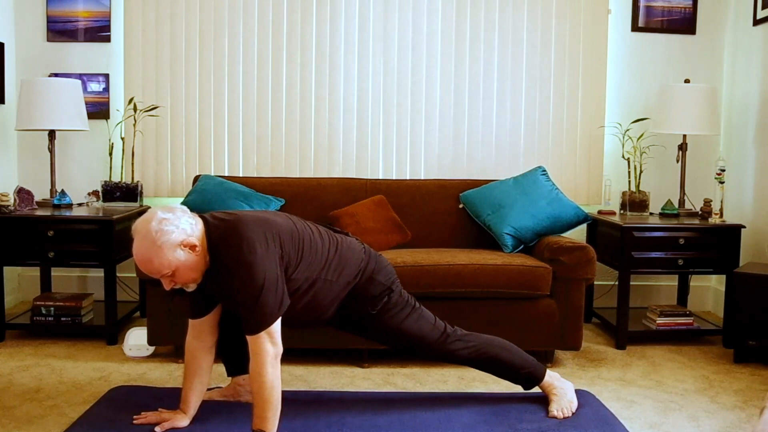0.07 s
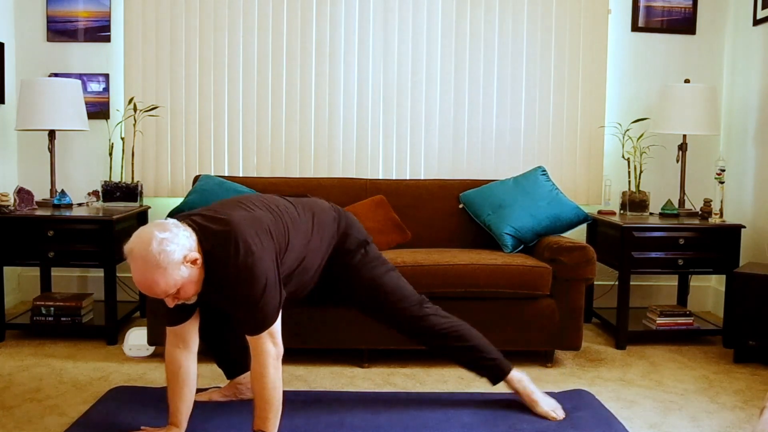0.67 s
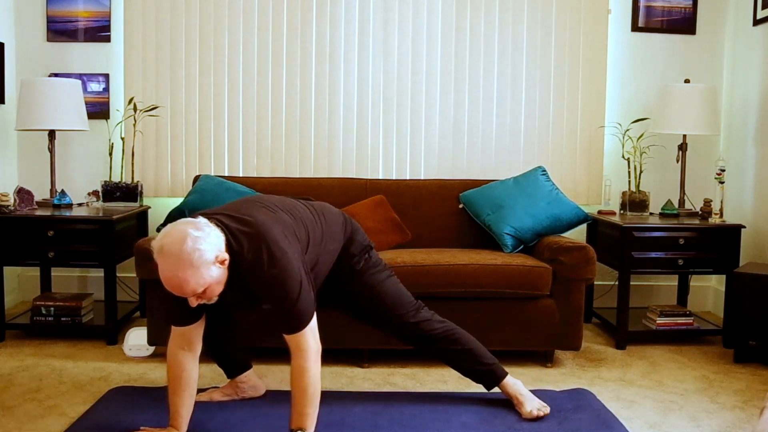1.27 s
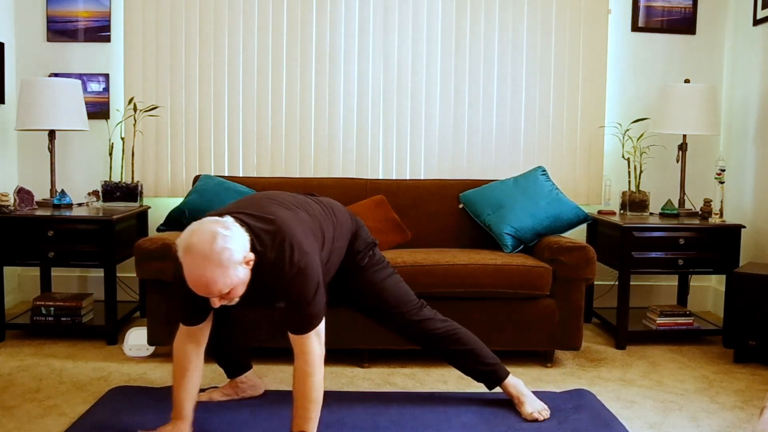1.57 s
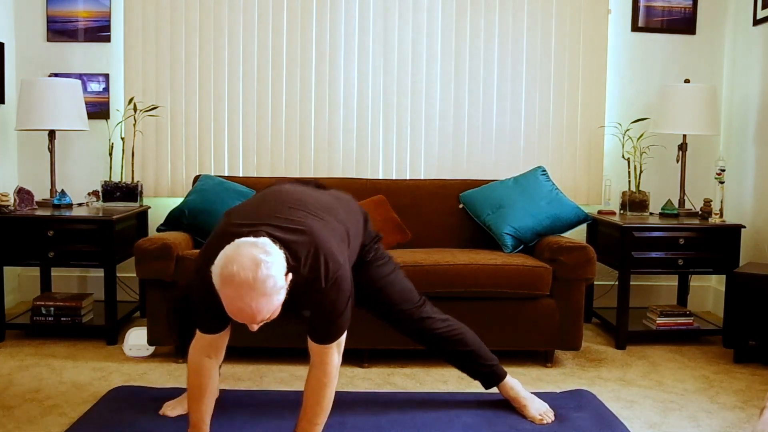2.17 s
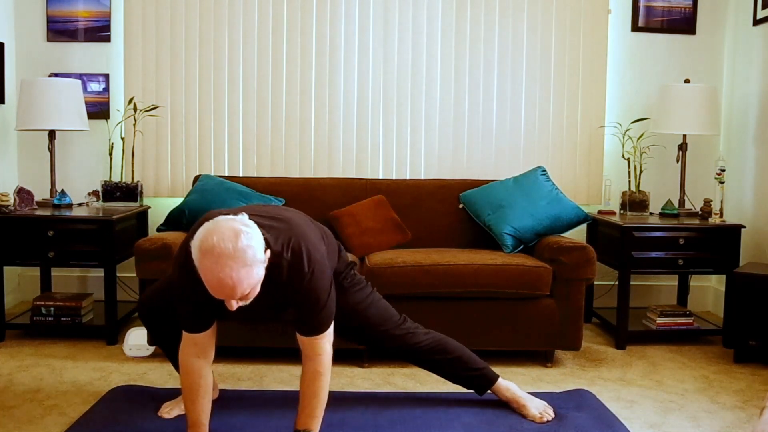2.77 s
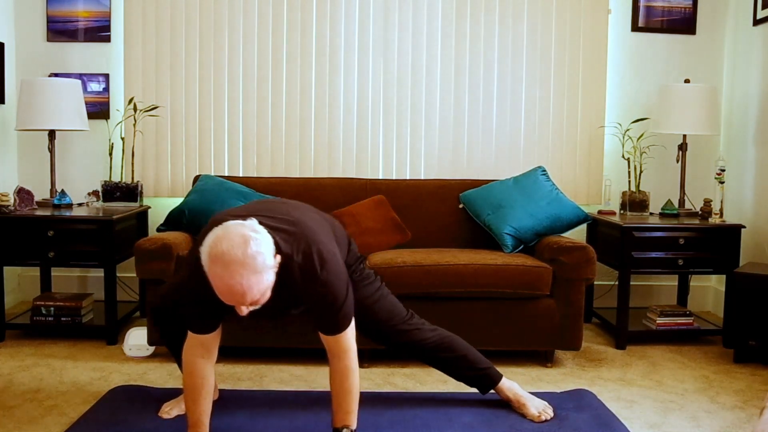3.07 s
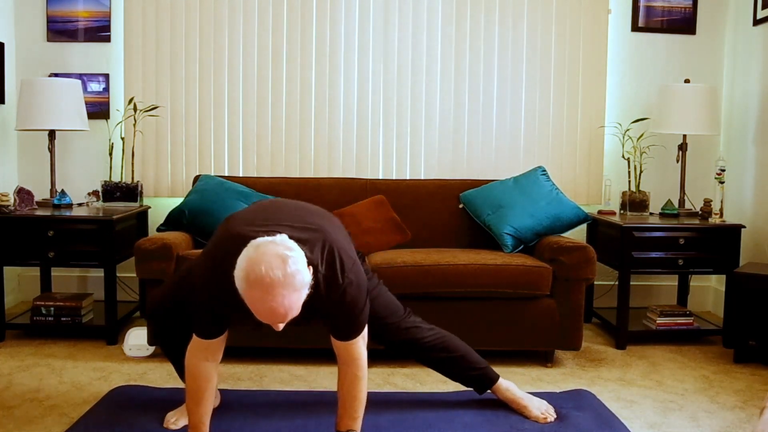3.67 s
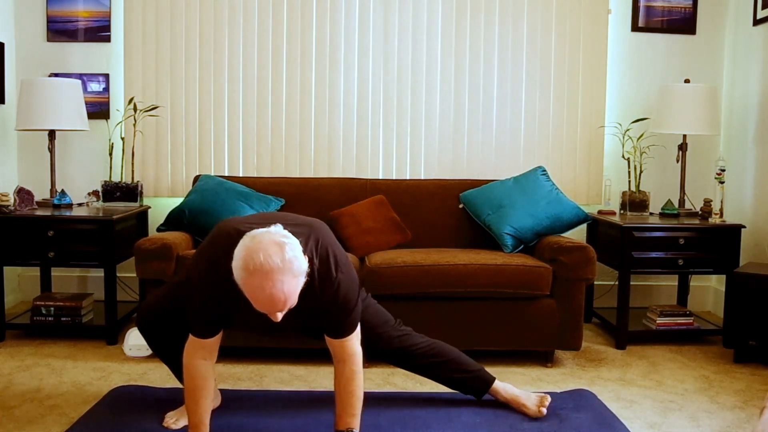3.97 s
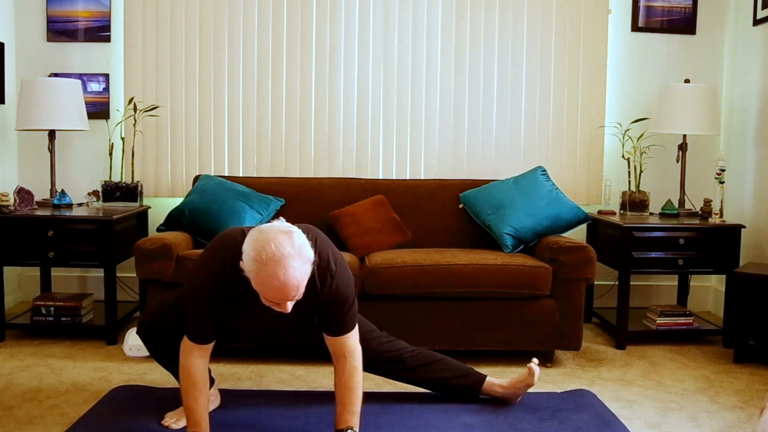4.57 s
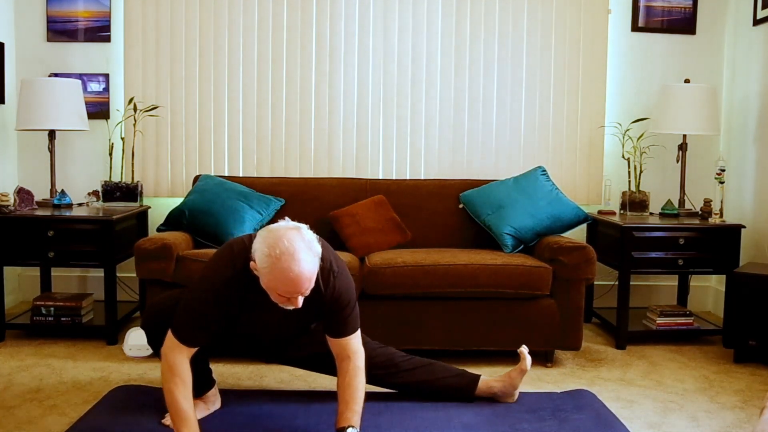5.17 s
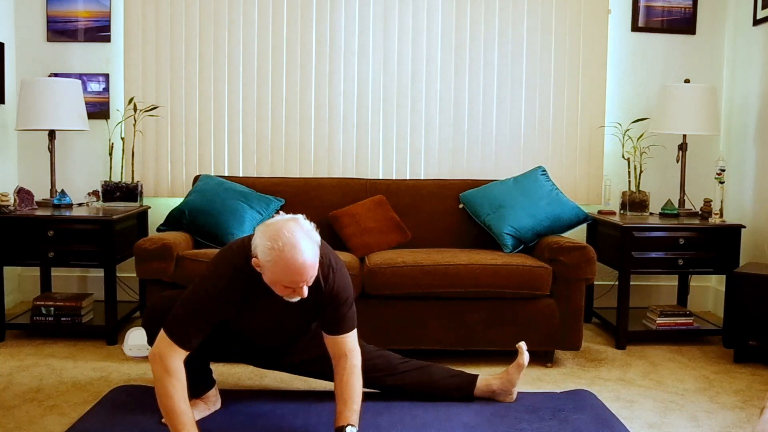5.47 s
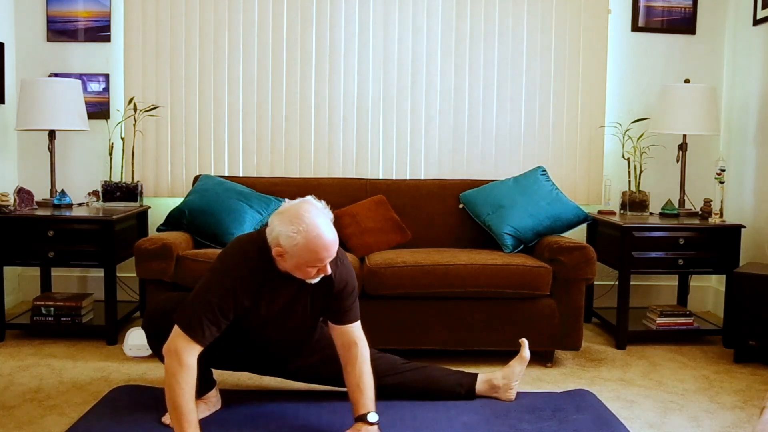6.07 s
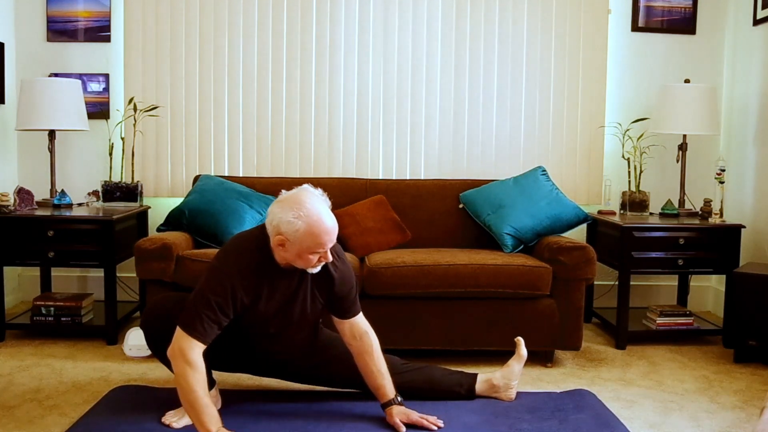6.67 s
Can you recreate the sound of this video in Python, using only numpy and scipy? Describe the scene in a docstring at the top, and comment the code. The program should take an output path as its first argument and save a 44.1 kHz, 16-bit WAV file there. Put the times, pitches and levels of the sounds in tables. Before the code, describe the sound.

Soft clothing swishes, skin scuffs and dull thuds of hands and feet shifting on a foam mat in a quiet room.

```python
"""A quiet, carpeted living room, where a person shifts from a lunge into a side stretch on a foam mat.
Sliding friction makes clothes swish and skin drag and scuff; sticking skin snaps and squeaks once.
Hands and heels thud on a springy floor and excite its modes, and a joint cracks.
One microphone picks it up over room tone, its own hiss and a thin electronic whine."""
import sys
import numpy as np
from scipy import signal
from scipy.fft import rfft, irfft
from scipy.io import wavfile

SR = 44100
rng = np.random.default_rng(int(sys.argv[2]) if len(sys.argv) > 2 else 0)


def bounce(signal):
    """Save signal as a 16-bit WAV file at the path given by the first command-line argument."""
    frames = np.transpose(np.atleast_2d(signal))
    limited = np.clip(frames, -1, 1)
    pcm = np.round(limited * 32767).astype(np.int16)
    wavfile.write(sys.argv[1], SR, pcm)


N = 305678
T = np.arange(N) / SR

# Spectrum of room tone and microphone hiss: f/Hz, relative level/dB
BACKGROUND_SPECTRUM = [(26, -36), (45, -1), (106, -1.5), (145, -3.5), (243, -3.5), (334, -4.5), (377, -5),
                       (662, -6.5), (748, -5), (805, -8), (1680, -10), (1940, -12), (13400, -17.5),
                       (15500, -17)]
# Cloth sliding on cloth, one stroke per move of a limb: peak t/s, level/dB, rise/s, fall/s
CLOTH_STROKES = [(.338, -43.5, 0.036, 0.034), (.607, -50, 0.017, .02), (.73, -45.5, 0.054, 0.095),
                 (.895, -46, .01, .025), (.96, -49, .03, .08), (1.155, -50.5, 0.037, 0.028),
                 (1.29, -45, 0.029, 0.033), (1.655, -41, 0.024, 0.019), (1.748, -44.5, 0.017, 0.029),
                 (1.99, -47.5, 0.042, 0.066), (2.29, -50, .015, 0.065), (2.93, -51.5, .03, 0.022),
                 (3.135, -50.5, 0.022, 0.016), (3.32, -48.5, .016, 0.067), (3.55, -54.5, .02, 0.17),
                 (4.06, -52, .05, 0.093), (4.52, -52, 0.031, 0.086), (4.79, -54, .04, 0.28),
                 (5.28, -52, 0.061, 0.066), (6.08, -61, .1, 0.063), (6.575, -52, .028, 0.13)]
# Spectrum of a cloth swish, including the microphone's peak near 11 kHz: f/Hz, relative level/dB
CLOTH_SPECTRUM = [(150, -5.5), (450, -4), (1200, -9.5), (2500, -10.5), (5000, -8.5), (8000, -6.5),
                  (10000, -2), (11400, 2), (13000, -8), (15500, -10.5)]
# Skin dragging over the mat: peak t/s, level/dB, rise/s, fall/s
SKIN_DRAGS = [(.335, -53, .012, 0.047), (.735, -45.5, .05, 0.064), (.897, -48.5, .012, 0.095),
              (1.14, -58.5, .02, .03), (1.29, -61, .03, .03), (1.965, -50.5, 0.017, 0.074),
              (2.295, -60, .02, .06), (3.335, -51.5, 0.027, 0.054), (4.05, -58, 0.046, .07)]
# Spectrum of dragging skin: f/Hz, relative level/dB
DRAG_SPECTRUM = [(150, -16.5), (450, -0.5), (1000, -8.5), (1800, -4.5), (2800, -2), (4200, -4.5),
                 (6500, -10.5), (12000, -18)]
# Weight dropping on the joists: t/s, sway level/dB
JOIST_LOADS = [(.5, -47.5), (0.829, -40), (1.22, -41), (2.216, -28), (3.319, -42), (3.546, -34),
               (4.24, -48.5)]
# Hands and feet landing: t/s, contact level/dB, cutoff f/Hz, push time/s, knock f/Hz,
# relative knock level/dB, level of the following weight/dB
LANDINGS = [(.585, -47, 1100, 0.0072, 715, -4, -62), (0.939, -52.5, 450, .004, 238, 11.5, -66),
            (2.04, -39, 950, 0.0081, 430, 0, -56), (2.193, -41, 1400, .016, 840, -2, -58),
            (3.207, -33.5, 1600, 0.0013, 1013, -6.5, -40), (3.261, -42.5, 700, .008, 100, -2, -44),
            (3.388, -39.5, 550, .011, 440, 3, -45), (3.4, -38, 420, 0.0044, 336, 6, -48),
            (3.415, -44, 400, .008, 211, 12, -60), (3.521, -41, 750, 0.006, 270, -4, -58),
            (5.234, -45, 700, .01, 151, 2, -49.5), (5.366, -45, 890, 0.0054, 406, -6, -49),
            (5.5945, -39.5, 1400, .0008, 152, -5, -46), (5.832, -42, 450, 0.0068, 155, 1, -57),
            (6.719, -55, 600, .009, 186, 0, -59)]
# Spectrum of a blow on the floor: f/Hz, relative level/dB
THUD_SPECTRUM = [(40, -22), (90, 1.5), (170, 1.5), (300, -3), (600, -3), (1000, -10), (1400, -10.5),
                 (3000, -12), (8000, -6)]
# Modes of the floor under the mat: f/Hz, bandwidth/Hz, gain/dB
BOARD_MODES = [(172, 22, -8), (447, 70, -12), (800, 53, 7), (1017, 41, 8)]
# Quick scuffs of a foot: peak t/s, level/dB, rise/s, fall/s, treble tilt/(dB per octave)
FOOT_SCUFFS = [(2.043, -29, 0.0061, 0.0018, 1), (2.048, -18.5, 0.0015, 0.0018, 13),
               (2.066, -31.5, 0.011, 0.031, -1.5), (2.0766, -28, 0.0032, 0.011, 4.5),
               (2.205, -40.5, 0.017, 0.039, 2), (3.409, -30, 0.012, 0.019, -0.5)]
# Spectrum of a foot scuff, including the microphone's peak near 11 kHz: f/Hz, relative level/dB
SCUFF_SPECTRUM = [(240, -27), (400, 2), (560, -14), (663, -4), (1000, -11.5), (1100, -9), (1510, -12.5),
                  (1740, -4), (1990, -13.5), (2360, -3), (2670, -6.5), (3460, -9), (7790, -8),
                  (11600, -0.5), (15500, -10.5)]
# Snaps of sticking skin, small ticks and joint cracks: t/s, level/dB, f/Hz, relative echo level/dB
SNAPS = [(2.045, -18, 6500, 4), (2.0474, -11.5, 7850, -1), (5.7699, -31, 8000, -5),
         (5.7764, -24, 10400, -2), (5.798, -30.5, 1510, 5), (5.7981, -31, 3230, 3), (5.804, -24, 5430, 2),
         (5.807, -26.5, 8600, 1.5)]


def undb(db):
    """Amplitude ratio of a level in decibels."""
    return 10 ** (np.asarray(db) / 20)


def unit(x):
    """Normalisation to an rms of 1."""
    return x / np.sqrt(np.mean(x ** 2))


def add(out, s, x):
    """Superposition: x adds to out from time s."""
    i = int(s * SR)
    out[i:i + len(x)] += x[:len(out) - i]


def colour(x, points):
    """Minimum-phase filter through (f/Hz, level/dB) points; it conserves the power of white noise."""
    hz, db = np.transpose(points)
    size = 8192
    f = np.maximum(np.fft.rfftfreq(size, 1 / SR), 1)
    gain = undb(np.interp(np.log(f), np.log(hz), db))
    cepstrum = irfft(np.log(gain))
    cepstrum[1:size // 2] *= 2  # folding onto positive time makes the filter causal
    cepstrum[size // 2 + 1:] = 0
    response = irfft(np.exp(rfft(cepstrum)))
    return signal.fftconvolve(x, response / np.linalg.norm(response))[:len(x)]


def resonate(x, hz, width_hz):
    """Second-order resonance with unit gain at its centre."""
    return signal.lfilter(*signal.iirpeak(hz, hz / width_hz, fs=SR), x)


def wander(rate_hz):
    """Random modulation of rms 1, interpolated between rate_hz values a second."""
    knots = rng.standard_normal(4096)
    return unit(np.interp(T * rate_hz, np.arange(len(knots)), knots))


def friction(spread_db, patchy_db, patch_hz):
    """Friction noise is the sum of countless tiny slips of unequal size, coming in patches."""
    slips = rng.standard_normal(N) * undb(spread_db * np.minimum(rng.exponential(size=N), 2 * np.pi))
    return unit(slips * undb(patchy_db * wander(patch_hz)))


def swell(s, rise_s, fall_s):
    """Speed envelope of one movement: it gathers, peaks at time s and eases off."""
    from_peak = np.maximum((s - T) / rise_s, (T - s) / fall_s)
    return 1 / np.cosh(np.minimum(from_peak, 30))


def effort(moves):
    """Envelope of a run of movements: incoherent sources add in power."""
    return np.sqrt(sum((undb(db) * swell(s, rise, fall)) ** 2 for s, db, rise, fall in moves))


def reverberation(x, t60_s, build_s, treble_t60_ratio=0.63):
    """A diffuse field decays exponentially; carpet and sofa absorb the treble first."""
    t = T[:SR // 2]
    noise = rng.standard_normal(len(t))
    low = signal.sosfilt(signal.butter(1, 5000, fs=SR, output="sos"), noise)
    tail = low * undb(-60 * t / t60_s) + (noise - low) * undb(-60 * t / (t60_s * treble_t60_ratio))
    tail *= np.minimum(t / build_s, 1)
    return signal.fftconvolve(x, tail / np.linalg.norm(tail))[:len(x)]


def background(tone_db=-51.5, port_hz=11200, port_db=-12, whine_hz=15000, whine_db=-69):
    """Noise floor: room tone and hiss, lifted by the microphone port's resonance, and electronic whine."""
    tone = colour(rng.standard_normal(N), BACKGROUND_SPECTRUM) * undb(tone_db + 0.19 * wander(3.79))
    port = undb(port_db) * resonate(tone, port_hz, 1900)
    whine = undb(whine_db) * np.sqrt(2) * np.sin(2 * np.pi * whine_hz * T)
    return tone + port + whine


def cloth_swishes(rasp_hz=4900, rasp_db=-19):
    """Sliding friction between folds of fabric gives a bright swish; the weave rasps in one band."""
    swish = colour(friction(spread_db=1.8, patchy_db=1.0, patch_hz=110), CLOTH_SPECTRUM)
    rasp = unit(resonate(swish, rasp_hz, 1600))
    return effort(CLOTH_STROKES) * (swish + undb(rasp_db) * rasp)


def skin_drags():
    """Friction under load: skin drags on the mat with a lower, rougher sound than cloth."""
    slips = friction(spread_db=3.7, patchy_db=0.88, patch_hz=70)
    return colour(effort(SKIN_DRAGS) * slips, DRAG_SPECTRUM)


def joist_sway(first_hz=19, t60_s=1.85, second_hz=43, second_db=-18, rumble_hz=66, rumble_db=-23):
    """Free vibration: after each load the floor rumbles and sways in its lowest modes, never at rest."""
    out, t = np.zeros(N), T[:2 * SR]
    fade = undb(-60 * t / t60_s)
    onset = 1 - np.exp(-(t / 0.011) ** 2)
    sway = np.sin(2 * np.pi * first_hz * t) * fade
    sway += undb(second_db) * np.sin(2 * np.pi * second_hz * t) * fade ** 2
    for s, db in JOIST_LOADS:
        noise = rng.standard_normal(len(t))
        rumble = unit(resonate(resonate(noise, rumble_hz, 45), rumble_hz, 45))
        add(out, s, undb(db) * (sway + undb(rumble_db) * rumble * fade ** 2) * onset)
    tremor = resonate(resonate(rng.standard_normal(N), first_hz, 2.4), first_hz, 14)
    unevenness = undb(2.0 * wander(7.3))
    return out * unevenness + undb(-57) * unit(tremor)


def thud(cutoff_hz, push_s, knock_hz, knock_db, knock_t60_s=0.073, tail_db=-3, tail_t60_s=0.34):
    """A padded impact of given attack and brightness excites floor modes and dies away in the room."""
    t = T[:SR // 2]
    blow = undb(-60 * t / knock_t60_s)
    tail = undb(tail_db - 60 * t / tail_t60_s)
    shake = colour(rng.standard_normal(len(t)), THUD_SPECTRUM)
    shake += sum(undb(db) * resonate(shake, hz, width) for hz, width, db in BOARD_MODES)
    shake = unit(signal.sosfilt(signal.butter(2, cutoff_hz, fs=SR, output="sos"), shake))
    # each spot on the floor favours one heavily damped mode
    knock = undb(knock_db) * np.sqrt(2) * np.sin(2 * np.pi * knock_hz * t)
    contact = 1 - np.exp(-2 * t / push_s)
    return contact * (knock * blow + shake * np.hypot(blow, tail))


def landings(weight_lag_s=0.023):
    """Impact in two stages: a hand or foot touches down, then the weight follows as a dull, low blow."""
    out = np.zeros(N)
    for s, db, cutoff_hz, push_s, knock_hz, knock_db, weight_db in LANDINGS:
        add(out, s, undb(db) * thud(cutoff_hz, push_s, knock_hz, knock_db))
        weight = thud(cutoff_hz=437, push_s=0.0087, knock_hz=176, knock_db=1.5)
        add(out, s + weight_lag_s, undb(weight_db) * weight)
    return out


def foot_scuffs(ring_db=-5, echo_db=-12):
    """A foot skids and grips by friction; something in the room rings faintly in sympathy."""
    skids = np.zeros(N)
    for s, db, rise, fall, tilt in FOOT_SCUFFS:
        speed = np.exp(np.minimum((T - s) / rise, (s - T) / fall).clip(-50))
        near = slice(int((s - 0.2) * SR), int((s + 0.3) * SR))
        skid = undb(db) * speed * friction(spread_db=2.8, patchy_db=0.67, patch_hz=500)
        add(skids, T[near][0], colour(skid[near], [(1000, 0), (16000, 4 * tilt)]))
    direct = colour(skids, SCUFF_SPECTRUM)
    modes = resonate(direct, 2380, 320) + 1.16 * resonate(direct, 3130, 690)
    ring = reverberation(modes, t60_s=0.18, build_s=0.059)
    echo = reverberation(direct, t60_s=0.82, build_s=0.0035)
    return direct + undb(ring_db) * ring + undb(echo_db) * echo


def snaps(gain_db=4, decay_cycles=0.75):
    """Sudden release of skin or a joint gives a damped oscillation of a cycle or two, then an echo."""
    direct, to_room, t = np.zeros(N), np.zeros(N), T[:SR // 100]
    for s, db, hz, echo_db in SNAPS:
        snap = undb(db + gain_db) * np.sin(2 * np.pi * hz * t) * np.exp(-t * hz / decay_cycles)
        add(direct, s, snap)
        add(to_room, s, snap * undb(echo_db))
    echo = reverberation(to_room, t60_s=0.34, build_s=0.0013)
    return colour(direct + echo, [(300, -3), (1200, 1.5), (11500, 5.5), (15000, 2)])


def skin_squeak(peak_s=3.535, hz=14200, width_hz=250, level_db=-56):
    """Stick-slip friction: skin grips for an instant and gives a thin, very high band of noise."""
    note = resonate(resonate(rng.standard_normal(N), hz, width_hz), hz, width_hz)
    return undb(level_db) * swell(peak_s, rise_s=0.004, fall_s=0.016) * unit(note)


def scene():
    """Sound pressures superpose at one microphone, which feeds both channels alike."""
    mono = cloth_swishes() + skin_drags() + foot_scuffs() + landings()
    mono += snaps() + skin_squeak() + joist_sway() + background()
    return np.array([mono, mono])


def record(dry, cutoff_hz=15600):
    """Band limiting: the recorder's steep low-pass filter removes the highest treble."""
    return signal.sosfilt(signal.ellip(12, 0.1, 80, cutoff_hz, fs=SR, output="sos"), dry)


dry = scene()
out = record(dry)
bounce(out)
```